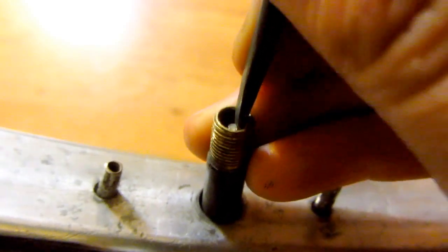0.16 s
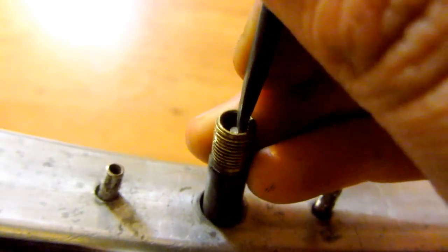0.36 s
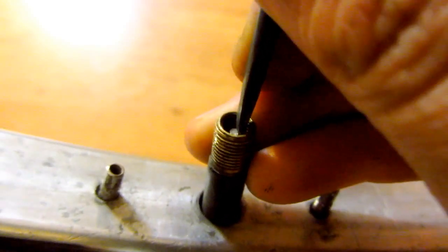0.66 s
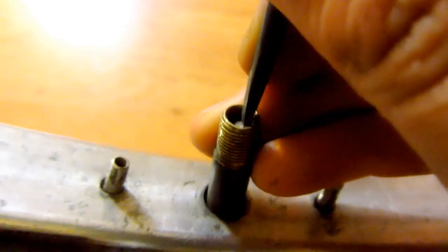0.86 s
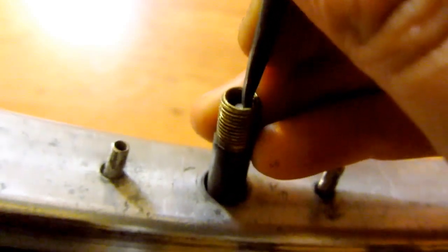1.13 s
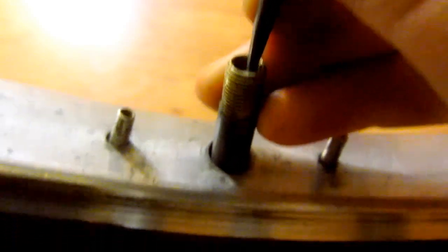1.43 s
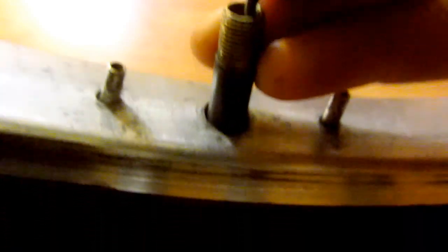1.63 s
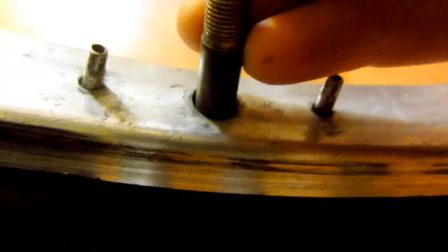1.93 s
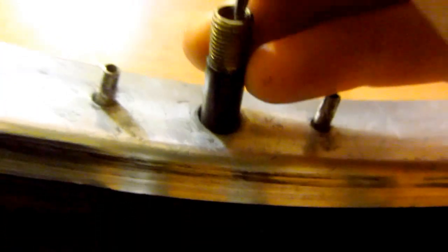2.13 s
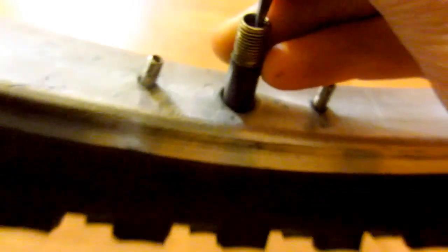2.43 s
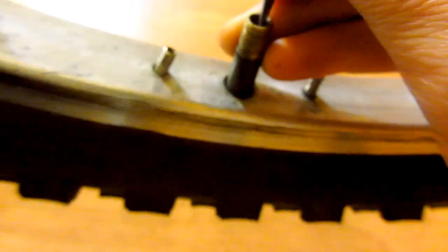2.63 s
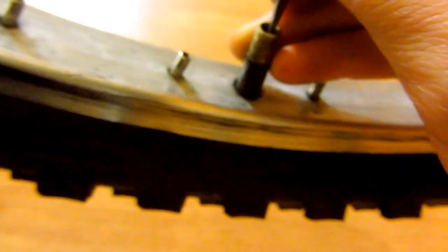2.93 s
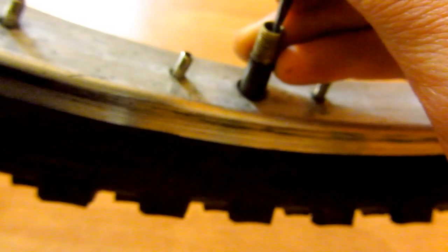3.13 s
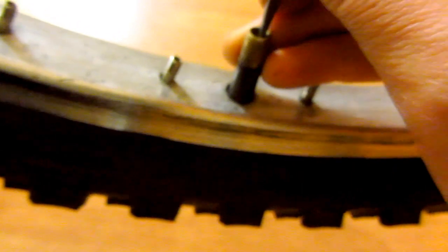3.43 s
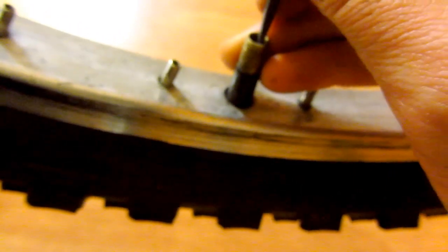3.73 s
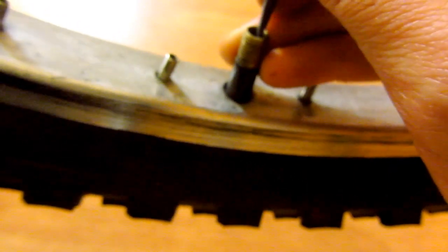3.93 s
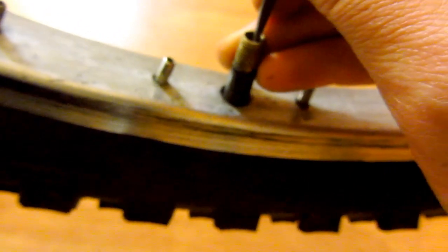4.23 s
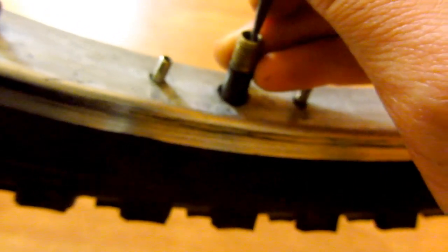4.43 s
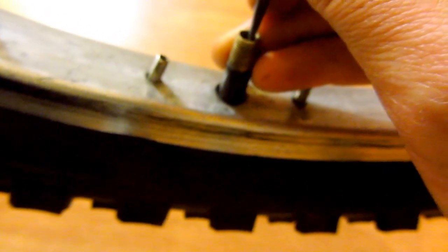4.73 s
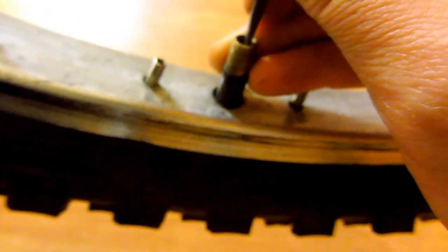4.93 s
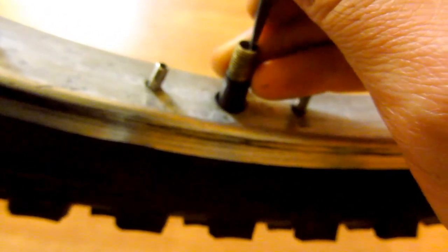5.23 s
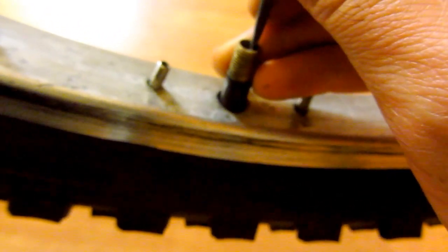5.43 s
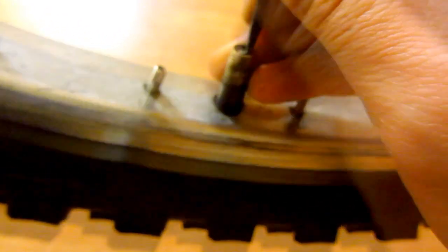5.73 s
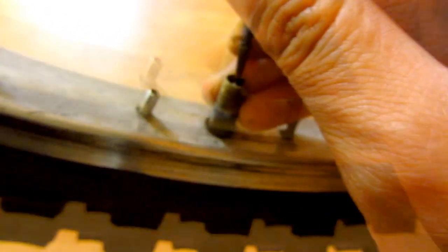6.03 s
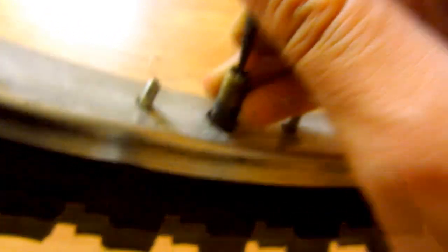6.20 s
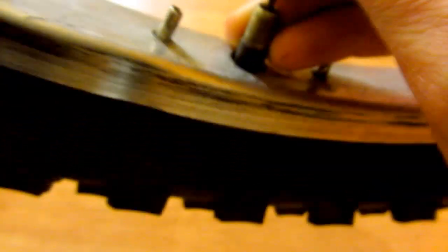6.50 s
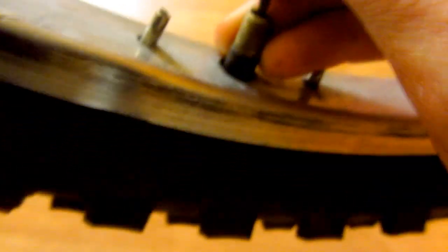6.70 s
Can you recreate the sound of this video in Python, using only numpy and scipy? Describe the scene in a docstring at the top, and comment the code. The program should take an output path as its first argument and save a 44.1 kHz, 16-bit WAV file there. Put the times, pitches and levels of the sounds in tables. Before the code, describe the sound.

A bicycle valve releases a gusty blast of air that turns hissy, cuts off with a sharp click, and resumes as a fading leak.

```python
"""A rush of air from a bicycle tube valve, its pin held down by a tool, buffets a close microphone.
As the tube empties, the turbulent jet thins to a bright hiss in the narrow gap round the pin.
The tool ticks and slips, and the pin snaps shut with a sharp pressure pulse. Pressed again, it lets
the last air sigh out through a faint resonance of the valve bore, while the tool knocks once on
the rubber stem. A small, murmuring room adds a short reverberation."""
import sys
import numpy as np
from scipy import signal
from scipy.fft import rfft, irfft, next_fast_len
from scipy.io import wavfile

SR = 44100
rng = np.random.default_rng(int(sys.argv[2]) if len(sys.argv) > 2 else 0)


def put_to_file(sound):
    """Save the sound as 16-bit audio at rate SR, in the file named by the first command-line argument."""
    columns = np.atleast_2d(sound).T  # one column per channel
    safe = np.clip(columns, -1, 1)
    whole_steps = np.round(safe * 32767)
    wavfile.write(sys.argv[1], SR, whole_steps.astype(np.int16))


N = 302658
TIME = np.arange(N) / SR
FFT_SIZE = next_fast_len(N, real=True)

# Noise spectra at the two microphone ports. Each row: frequency in Hz, relative spectral density in dB,
# left-right coherence, phase lead of the left in radians, level of left over right in dB.
ROOM_SPECTRUM = [(25, -26, .5, 0, 0), (70, -6, 0.36, 0, 0), (133, 1, 0.17, 0, -3), (250, -2, 0.15, 0, -2.5),
                 (600, -5.5, 0.2, 0, 0), (2000, -16, .2, 0, -12), (12000, -23, .1, 0, -2)]   # the quiet room
HOLLOW_SPECTRUM = [(302, -9.5, 0.51, 0.031, 2), (605, -1.5, 0.99, 0.3, 0), (1110, 3.5, 0.96, -0.039, -1),
                   (1690, 5, 0.99, -0.0, -1), (2280, -0.5, 1, -0.2, 0), (2920, 1.8, 0.72, -0.4, -5.5),
                   (3630, -2.5, 0.51, -0.2, -2)]   # the hollow midrange of the weak leak
LEAK_SPECTRUM = [(3870, -11.5, 0.96, 0, -3), (4650, -5, 1, -0.5, -1), (5500, 1, 0.39, 2.5, -20),
                 (6160, -3.5, 0.36, 2, -8), (7000, -3.5, 0.53, 1.7, -2), (7600, -3.5, 0.72, 1.5, 3),
                 (8250, -4.5, 0.59, 1.8, 3), (8650, -8.5, 0.15, 6, 5), (9400, -4.5, 0.48, 5, 10),
                 (10400, -3, 0.89, 7, 2), (11030, -8.1, 0.71, 6.5, 2), (12000, -16, 0.44, 7, 5),
                 (13600, -12.6, 0.57, 5, 6), (14600, -16.8, 0.77, 6.2, 2), (15500, -18, 0.3, 9.0, 7)]   # its hiss at first
LAST_AIR_SPECTRUM = [(3800, -6, 0.79, 0.1, -22), (5400, -3, 0.68, 0.3, -13), (6300, -6, 0.67, 0.7, 3),
                     (7200, -3, 0.7, 1.4, 5), (8100, -2, 0.68, 2.4, -2), (9000, -3.0, 0.7, 4.8, 1),
                     (10000, -2, 0.91, 4.3, -2), (11000, -3.8, 0.77, 4.1, -4),
                     (12200, -15.5, 0.42, 4.7, -9), (13000, -14.2, 0.8, 6.0, -2), (13900, -7, 0.78, 5.2, 0),
                     (15200, -21.0, 0.4, 5.8, 0)]   # its hiss as the pressure runs out
HISS_SPECTRUM = [(500, -24, 0.85, 1.5, -2), (4120, -15.5, 0.74, -1.5, -5), (4740, -10, 0.83, 0, -3.5),
                 (5500, -5.5, 0.28, 1.5, -11), (5980, -7, 0.15, -4, -3), (6670, -7, 0.42, -4.5, 12),
                 (7620, -1.7, 0.64, -2.5, -1), (9040, 0.5, 0.65, -0.9, -2.5), (10140, -2.5, 0.44, -1, 0),
                 (10700, -4.5, 0.63, -1.5, 1), (11260, -6.5, 0.61, -0.5, -7), (12200, -10.5, 0.74, -1.5, 4),
                 (13100, -6.5, 0.97, -1.7, -3.5), (14000, -12.6, 0.69, -1, 1), (15500, -17, 0.3, -3, 1)]   # the jet in the narrow pin gap
RUSH_SPECTRUM = [(100, -7.5, 0.94, -0.68, -22), (350, -1.5, 0.95, 0.29, -11.5), (1400, 0, 0.63, 0.16, -2),
                 (3010, 0, 0.39, -0.17, -1), (3970, -5.5, 0.29, -0.28, -0.5),
                 (5260, -0.8, 0.036, -0.3, -1.5), (6540, -1.3, 0.13, 1.45, -2), (8300, -5, 0.23, -0.37, 1),
                 (10300, -9.5, 0.5, -0.66, 5), (12200, -19, 0.3, -1.9, 0), (14500, -13, 0.33, 1.2, 1),
                 (15600, -13, 0.41, -0.5, 5)]   # the jet at full pressure
# Turbulence on the ports. Each row: frequency in Hz, relative spectral density in dB, left-right
# correlation (negative where big eddies push the two sides in opposite senses).
DRAUGHT_SPECTRUM = [(25, -28, -0.88), (60, -8.5, -0.64), (128, -0.5, -0.59), (250, -5, -0.61),
                    (490, -9.5, -0.55), (1010, -18, -0.32), (1980, -26, -0.32), (4000, -40.5, 0.17)]
# Modes of the stem in the rim. Each row: frequency in Hz, relative level in dB, 60 dB decay in seconds.
STEM_MODES = [(420, -2, 0.033), (530, 8, 0.024), (700, 1, 0.035), (980, 1, 0.028)]
# Contacts of the tool on the pin. Each row: start in seconds, peak level in dB.
TOOL_TICKS = [(4.868, -17), (5.085, -19)]
# Strong eddies that hit the microphone. Each row: start in seconds, relative peak level in dB.
STRONG_EDDIES = [(0.017, -28), (0.803, -12), (0.832, -4), (1.177, -18), (1.262, -17), (1.439, -12),
                 (1.559, -8), (1.686, -9), (1.725, -9), (1.92, -9.5), (2.005, -11), (2.102, -9)]
# Gusts on the microphone. Each row: time of the crest in seconds, length in seconds, rise in dB.
STREAM_GUSTS = [(0.558, 0.23, 3), (0.72, 0.12, 2.5), (1.07, 0.65, 2), (1.666, 0.23, 3), (1.867, 0.16, 2.5),
                (2.047, 0.089, 2.5)]
# Stages of the three parts of the leak. Each row: relative level in dB with the pin seated, cracked open
# and pressed, then the fade in dB over the first second of running out.
LEAK_HISS_STAGES = (-48.5, -32, -28, 42)
LEAK_HOLLOW_STAGES = (-58, -53.5, -37, 37)
LEAK_RING_STAGES = (-54, -52, -32, 27)

SETTLE_S = 1.236   # the pin settles and narrows the gap
SLIP_S, SLIP_GLIDE_S = 5.17, 0.073   # the tool starts to slip
SHUT_S = 5.5028   # the pin snaps onto its seat
CUTOFF_HZ = 15750


def from_db(db):
    """Amplitude grows tenfold with every 20 dB."""
    return 10 ** (np.asarray(db) / 20)


def unit_rms(x):
    """Division by the root mean square gives unit power."""
    return x / np.sqrt(np.mean(x ** 2) + 1e-20)


def ramp(start_s, glide_s):
    """A linear transition from 0 to 1."""
    return np.clip((TIME - start_s) / glide_s, 0, 1)


def swell(crest_s, length_s, rise_db):
    """A half-sine rise and fall, in dB."""
    return rise_db * np.sin(np.pi * ramp(crest_s - length_s / 2, length_s))


def at_hz(spectrum, hz):
    """Interpolation of each column of a spectrum on a logarithmic frequency axis."""
    points, *columns = np.transpose(spectrum)
    return [np.interp(np.log(hz + 1e-3), np.log(points), column) for column in columns]


def cut(x, hz, kind, order=2):
    """A Butterworth filter, maximally flat in its passband."""
    sections = signal.butter(order, np.clip(hz, 10, .45 * SR), kind, fs=SR, output="sos")
    return signal.sosfilt(sections, x + 1e-18)


def drift(rate_hz, step=20):
    """Low-passed noise gives a smooth random fluctuation of unit spread."""
    pole = np.exp(-2 * np.pi * rate_hz * step / SR)
    slow = signal.lfilter([1], [1, -2 * pole, pole * pole], rng.standard_normal(N // step + 2002))[2000:]
    return np.interp(np.arange(N) / step, np.arange(len(slow)), unit_rms(slow))


def resonate(x, hz, width_hz):
    """A two-pole resonance with unit gain at its peak."""
    radius = np.exp(-np.pi * width_hz / SR)
    feedback = [1, -2 * radius * np.cos(2 * np.pi * hz / SR), radius ** 2]
    return signal.lfilter(np.array([1, 0, -1]) * (1 - radius ** 2) / 2, feedback, x)


def whistle(hz, width_hz):
    """Cavity resonance shapes turbulence into a broad, airy tone of unit power."""
    return unit_rms(resonate(resonate(rng.standard_normal(N), hz, width_hz), hz, 2 * width_hz))


def air_noise(spectrum, low_hz):
    """Partial coherence: the two ports share only part of a steady noise of unit power."""
    hz = np.arange(FFT_SIZE // 2 + 1) * SR / FFT_SIZE
    density_db, coherence, lead, pan_db = at_hz(spectrum, hz)
    coherence = np.clip(coherence, 0, .99)
    shared, own = rfft(rng.standard_normal((2, FFT_SIZE)))
    left = shared * np.exp(1j * lead) * from_db(pan_db / 2)
    right = (coherence * shared + np.sqrt(1 - coherence ** 2) * own) * from_db(-pan_db / 2)
    gain = from_db(density_db) * np.sqrt(2 / (from_db(pan_db) + from_db(-pan_db))) * (hz < CUTOFF_HZ)
    noise = irfft(np.array([left, right]) * gain, FFT_SIZE)[:, :N]
    return unit_rms(cut(noise, low_hz, "high"))


def pops(events, low_hz, high_hz):
    """A band-limited impulse is a short pressure pulse with an undershoot; one sounds for each event."""
    impulses = np.zeros(N)
    for start_s, peak_db in events:
        impulses[round(start_s * SR)] = from_db(peak_db)
    pulse = cut(cut(signal.unit_impulse(SR // 20), high_hz, "low"), low_hz, "high")
    return signal.oaconvolve(impulses, pulse / np.abs(pulse).max())[:N]


def background(level_db=-50.5, gain_duck_db=-9.5, gain_recovery_s=0.63):
    """Low room murmur; the recorder's automatic gain ducks it at the snap, then recovers."""
    gain_db = gain_duck_db * (TIME > SHUT_S) * (1 - ramp(SHUT_S, gain_recovery_s))
    return from_db(level_db + gain_db) * air_noise(ROOM_SPECTRUM, low_hz=20)


def reverberation(x, t60_s=0.18, first_echo_s=0.0067, wall_cut_hz=17000):
    """Diffuse reflections in a small room decay exponentially, differently on each side."""
    age = TIME[:SR // 2]
    tail = rng.standard_normal((2, len(age))) * from_db(-60 * age / t60_s) * (age > first_echo_s)
    tail = cut(tail, wall_cut_hz, "low", order=1)
    return signal.oaconvolve(x, unit_rms(tail) / np.sqrt(len(age)), axes=1)[:, :N]


def stem_knock(start_s=5.9745, gain_db=-30, rise_s=0.0019):
    """The shifting tool excites the heavily damped modes of the rubber stem."""
    age = np.maximum(TIME - start_s, 0)
    modes = sum(from_db(db - 60 * age / t60) * np.sin(2 * np.pi * hz * age) for hz, db, t60 in STEM_MODES)
    return from_db(gain_db) * modes * (1 - np.exp(-age / rise_s))


def tool_ticks():
    """Brief impacts of the tool on the pin radiate small, dry pulses."""
    return pops(TOOL_TICKS, low_hz=400, high_hz=2800)


def leak_level(seated_db, cracked_db, pressed_db, fade_db, run_out_s=6.4):
    """Flow follows opening and pressure: the level in dB rises in two steps, then dies away."""
    cracked = ramp(start_s=5.578, glide_s=0.06)
    pressed = 1 - (1 - ramp(start_s=5.747, glide_s=0.32)) ** 2
    opening_db = (cracked_db - seated_db) * cracked + (pressed_db - cracked_db) * pressed
    return seated_db + opening_db - fade_db * np.maximum(TIME - run_out_s, 0) ** 1.41


def leak(hiss_gain_db=1.5, ring_gains_db=(-2, 0), last_air_s=(6.18, 6.56)):
    """Weak turbulence at the half-open pin hisses and excites a broad resonance of the valve bore."""
    spent = np.interp(TIME, last_air_s, [0, 1])
    early, late = np.sqrt(1 - spent), np.sqrt(spent)   # the colour changes as the pressure runs out
    hiss = early * air_noise(LEAK_SPECTRUM, low_hz=3500) + late * air_noise(LAST_AIR_SPECTRUM, low_hz=4000)
    hiss *= from_db(leak_level(*LEAK_HISS_STAGES) + hiss_gain_db)
    last_puff_db = swell(crest_s=6.74, length_s=.11, rise_db=5)
    hollow = unit_rms(cut(air_noise(HOLLOW_SPECTRUM, low_hz=380), 4100, "low", order=6))
    hollow *= from_db(leak_level(*LEAK_HOLLOW_STAGES) + last_puff_db)
    # a slower stream damps the bore less: its ring narrows and sinks a little
    ring = early * whistle(hz=4950, width_hz=1150) + late * whistle(hz=4630, width_hz=520)
    ring *= from_db(leak_level(*LEAK_RING_STAGES))
    return hiss + hollow + np.outer(from_db(ring_gains_db), ring)


def snap(suction_lag_s=.0003, pan_db=.7):
    """Stopping a flow at once sends out a sharp pressure pulse, followed by a soft suction."""
    crack = pops([(SHUT_S, -5)], low_hz=840, high_hz=2720)
    suction = pops([(SHUT_S + suction_lag_s, -25)], low_hz=149, high_hz=480)
    return (crack - suction) * from_db([[-pan_db], [pan_db]])


def stream_level(full_db=-20.5, fall_db=18, away_db=-10, slip_db=-8, lull_s=0.26):
    """Wind noise, in dB, follows the pressure in the tube and the aim of the stream."""
    steady_db = full_db - fall_db * ramp(0, SHUT_S) ** 3.14
    drawn_back = ramp(start_s=2.11, glide_s=0.35)   # the microphone draws back
    aim_db = away_db * drawn_back + slip_db * ramp(SLIP_S, SLIP_GLIDE_S)
    lull_db = swell(SETTLE_S + lull_s / 2, lull_s, rise_db=-2)   # swinging aside as the pin settles
    return steady_db + aim_db + lull_db + sum(swell(*gust) for gust in STREAM_GUSTS)


def stream_tilt(level_db, fast_tilt=4, slow_tilt=-0.64, grazing_tilt=4, slowing_s=0.79):
    """Spectral tilt in dB per octave: a direct stream dulls as it slows; a grazing one stays bright."""
    direct_tilt = slow_tilt + (fast_tilt - slow_tilt) * np.exp(-(TIME / slowing_s) ** 2)
    directness = np.interp(level_db, [-31, -23], [0, 1])
    return grazing_tilt + (direct_tilt - grazing_tilt) * directness


def pushes(per_s=95, spread_db=4.0, low_hz=115, high_hz=320):
    """Eddies arrive as a Poisson process; each presses on one port and sucks at the other."""
    arrivals = rng.random(N) < per_s / SR
    hits = arrivals * from_db(spread_db * np.clip(rng.standard_normal(N), -1.5, 1.5))
    return unit_rms(cut(cut(hits, high_hz, "low"), low_hz, "high")) * [[1], [-1]]


def eddies(left_db=-1, right_db=-7):
    """The pressure of an eddy is local, so the strongest thud on one port more than on the other."""
    return from_db([[left_db], [right_db]]) * pops(STRONG_EDDIES, low_hz=109, high_hz=970)


def draught(lump_db=2.2, gust_db=0.6, band_flutter_db=1.5, push_db=-4.5):
    """Turbulent pressure sweeps over the ports, lumpier the more squarely the stream hits."""
    level_db = stream_level()
    tilt = stream_tilt(level_db)
    lumpiness = np.interp(level_db, [-36, -20], [.4, 1])
    shared_db = lump_db * drift(rate_hz=75) + gust_db * drift(rate_hz=13)
    edges_hz = 20 * 2 ** (np.arange(17) / 2)   # half-octave bands
    white = rng.standard_normal((2, 2, N))   # neighbouring bands get unrelated noise
    wind, power = 0, 0
    for k, (low, high) in enumerate(zip(edges_hz, edges_hz[1:])):
        hz = np.sqrt(low * high)
        density_db, correlation = at_hz(DRAUGHT_SPECTRUM, hz)
        mid, side = cut(white[k % 2], [low, high], "band")
        band = np.sqrt(1 + correlation) * mid + np.sqrt(1 - correlation) * side * [[1], [-1]]
        flutter_db = lumpiness * (shared_db + band_flutter_db * drift(rate_hz=29))
        band = unit_rms(band * from_db(flutter_db))
        gain = from_db(density_db) * np.sqrt(high - low)
        wind += gain * from_db(tilt * np.log2(hz / 200)) * band
        power += gain ** 2
    big_eddies = from_db(push_db + 0.5 * np.maximum(tilt, 0)) * pushes()   # felt one by one
    return from_db(level_db) * (wind / np.sqrt(power) + big_eddies)


def rush(full_db=-26, fall_db=17.5, settle_db=-2.5, recover_s=0.72, slip_db=-6):
    """Broadband jet noise depends on the driving pressure: it holds, then collapses as the tube empties."""
    steady_db = full_db - fall_db * ramp(0, SHUT_S) ** 5.37
    dip_db = settle_db * (ramp(SETTLE_S, glide_s=0.034) - ramp(SETTLE_S, recover_s))
    level_db = steady_db + dip_db + slip_db * ramp(SLIP_S, SLIP_GLIDE_S)
    air = from_db(level_db) * air_noise(RUSH_SPECTRUM, low_hz=91)
    shifted = ramp(start_s=1.5, glide_s=.25)   # one treble band sinks as the microphone shifts
    return air - .5 * shifted * resonate(air, hz=13800, width_hz=1500)


def gap_hiss(final_db=-20.5, rise_db=25, settle_db=7, build_s=0.39, sizzle_db=-34):
    """Turbulence in the narrow pin gap grows and levels off; the edge sizzles until the tool slips."""
    growth_db = -rise_db * (1 - ramp(0, SHUT_S)) ** 1.55 - settle_db * (1 - ramp(SETTLE_S, build_s))
    hiss = from_db(final_db + growth_db) * air_noise(HISS_SPECTRUM, low_hz=200)
    sizzle = from_db(sizzle_db + 1.9 * growth_db) * whistle(hz=14200, width_hz=950)
    return hiss + (1 - ramp(SLIP_S, SLIP_GLIDE_S)) * sizzle


def jet(flutter_db=0.56):
    """A turbulent jet flutters in level; falling pressure trades its broad rush for hiss."""
    return (rush() + gap_hiss()) * from_db(flutter_db * drift(rate_hz=38))


def scene(seating_s=0.003, wet_db=-17.5, snap_wet_db=-11, boom_hz=650):
    """Superposition in the room: jet and draught until the pin shuts, the weak leak after it."""
    flowing = np.exp(-np.maximum(TIME - SHUT_S, 0) / seating_s)
    valve = flowing * jet() + (1 - flowing) * leak() + stem_knock() + tool_ticks()
    shut = snap()
    boom = cut(shut, boom_hz, "low", order=1)
    echoes = reverberation(from_db(wet_db) * valve + from_db(snap_wet_db) * boom)
    return valve + shut + echoes + flowing * draught() + eddies() + background()


def record(dry, ceiling=0.81):
    """Soft saturation rounds the strongest buffets; an elliptic low-pass cuts the top steeply."""
    rounded = dry / (1 + (dry / ceiling) ** 4) ** (1 / 4)
    return signal.sosfilt(signal.ellip(12, .1, 80, CUTOFF_HZ, fs=SR, output="sos"), rounded)


dry = scene()
out = record(dry)
put_to_file(out)
```